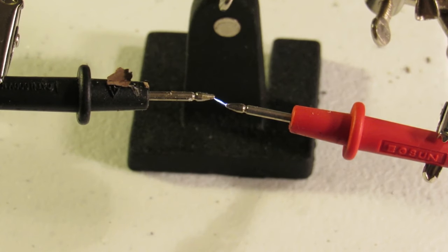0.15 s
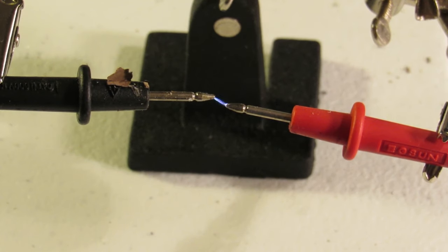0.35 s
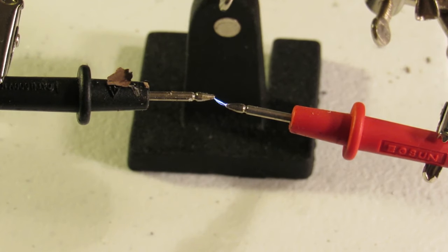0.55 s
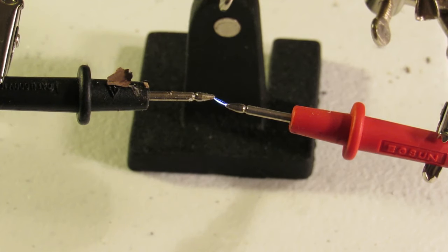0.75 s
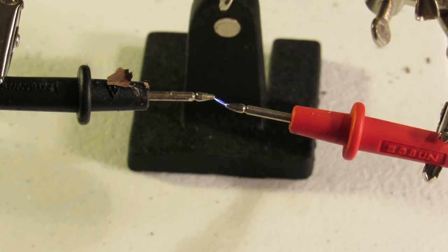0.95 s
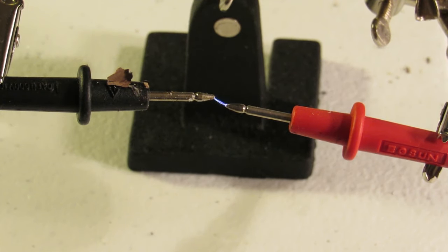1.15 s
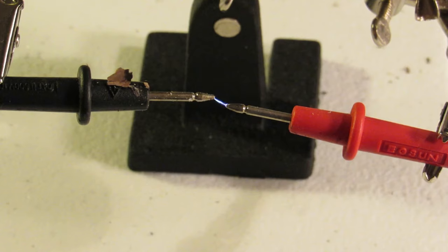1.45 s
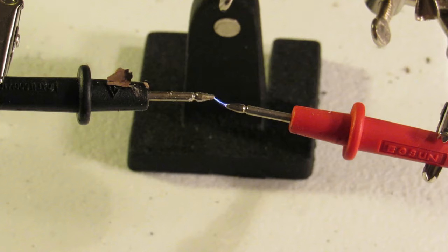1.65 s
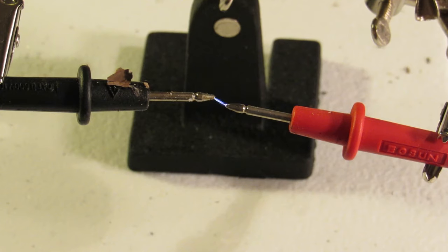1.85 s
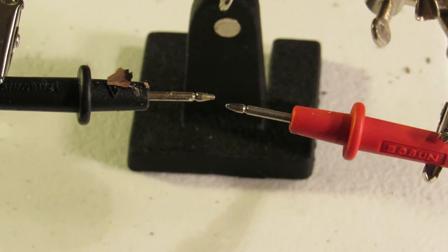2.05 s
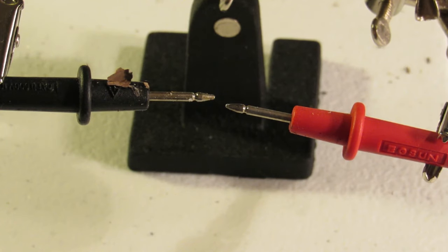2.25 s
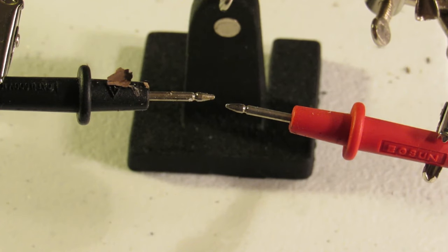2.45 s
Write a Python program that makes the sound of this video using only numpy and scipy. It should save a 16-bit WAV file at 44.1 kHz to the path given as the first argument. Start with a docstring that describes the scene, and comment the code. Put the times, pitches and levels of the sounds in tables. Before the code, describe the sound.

A harsh electric arc buzzes between two probe tips after a short quiet lead-in, wavering between whine and rasp, then cuts off and zaps twice briefly; close stereo microphone, small room, faint machine hum.

```python
"""On a workbench in a small room, a high-voltage arc burns between two probe tips, breaks off and strikes twice
more briefly; at the start only the room tail of an earlier burn is heard. The arc is a relaxation oscillator of
about 730 sparks a second: even spells whine, spells of early strikes rasp. Each snap is an impulse train
bounced off the stand and bench, then convolved with decaying noise for the clutter and room. Sine partials make
a faint machine hum, shaped noise makes the workshop air, and damped sines make a few soft knocks."""
import sys
import numpy as np
from scipy import signal
from scipy.fft import rfft, irfft
from scipy.io import wavfile

SR = 44100
rng = np.random.default_rng(int(sys.argv[2]) if len(sys.argv) > 2 else 0)


def output_pcm(signal):
    """Save a mono or channel-first signal as 16-bit PCM at the path in sys.argv[1].

    Samples are clipped to [-1, 1] before scaling.
    """
    pcm = np.clip(np.atleast_2d(signal).T, -1, 1) * 32767
    wavfile.write(sys.argv[1], SR, np.round(pcm).astype(np.int16))


N = 114660


def undb(db):
    """Decibel definition: 20 dB is a tenfold amplitude."""
    return 10 ** (np.asarray(db) / 20)


def rms(x):
    """Effective value: the root of the mean power."""
    return np.sqrt(np.mean(x ** 2))


def over_hz(points, size):
    """Logarithmic frequency scale: (Hz, value) points are joined along it at the bins of a transform."""
    hz, value = np.array(points, float).T
    bins_hz = np.fft.rfftfreq(size, 1 / SR)
    return np.interp(np.log(bins_hz + 1), np.log(hz), value)


def minimum_phase(points, size=1024):
    """Minimum phase: folding the cepstrum gives the most compact causal response with a given spectrum."""
    cepstrum = irfft(np.log(undb(over_hz(points, size))))
    cepstrum[1:size // 2] *= 2
    cepstrum[size // 2 + 1:] = 0
    return irfft(np.exp(rfft(cepstrum)))


def clicks(times, gains, size, order=8):
    """Band-limited interpolation: a windowed sinc places each impulse between samples."""
    at = times[:, None] * SR
    taps = np.floor(at).astype(int) + np.arange(1 - order, order + 1)
    window = np.sinc((taps - at) / order)
    shape = np.sinc(taps - at) * window * gains[:, None]
    return np.bincount(np.clip(taps, 0, size - 1).ravel(), shape.ravel(), size)


def cut(x, hz, kind, order=2):
    """Butterworth filtering: a maximally flat low-pass or high-pass."""
    return signal.sosfilt(signal.butter(order, hz, kind, fs=SR, output="sos"), x)


# partials of the machine: pitch_hz [Hz], left level_db [dB, rms], right_gain [ratio to left]
HUM_PARTIALS = [(213, -62.5, .6), (426, -67, .7), (852, -54.6, 1.), (1278, -55.3, 1.)]


def hum():
    """Fourier synthesis: steady sines add up to the hum of a small running machine."""
    t = np.arange(N) / SR
    out = np.zeros((2, N))
    for pitch_hz, level_db, right_gain in HUM_PARTIALS:
        sine = np.sin(2 * np.pi * (pitch_hz * t + rng.random()))
        out += np.sqrt(2) * undb(level_db) * np.array([[1], [right_gain]]) * sine
    return out


# relative spectrum of the workshop air: pitch_hz [Hz], level_db [dB per Hz]
AIR_SPECTRUM = [(20, -18), (45, 2), (90, -.5), (160, 7), (250, 4), (330, -1.5), (520, 0), (680, -9),
                (900, -6), (1300, -12.5), (2000, -22), (2900, -19), (4000, -30), (6000, -32),
                (15000, -35.5)]
# likeness of the air in the two channels: pitch_hz [Hz], likeness [-1 to 1]
AIR_LIKENESS = [(60, -.6), (130, -.4), (300, -.4), (600, .25), (1100, .8), (1800, .99), (5000, .99),
                (10000, .7)]
AIR_DB = -47.6  # rms before the microphone


def air():
    """Diffuse-field coherence: mid and side noise shares make a soft rush, wide in the bass, centred above."""
    likeness = np.clip(over_hz(AIR_LIKENESS, N), -.9, .99)
    shares = np.sqrt([1 + likeness, 1 - likeness])
    noise = rng.standard_normal((2, N))
    mid, side = irfft(rfft(noise) * undb(over_hz(AIR_SPECTRUM, N)) * shares, N)
    both = np.array([mid + side, mid - side])
    return both * undb(AIR_DB) / rms(both)


LEAD_S = .2  # time computed before the first audible sample
FLICKER_HZ = 55  # fresh random values per second


def writhing(times):
    """Random modulation: the channel writhes, a slow chance of about unit spread at the given times."""
    knots = rng.standard_normal(1024)
    return 1.2 * np.interp((times + LEAD_S) * FLICKER_HZ, np.arange(len(knots)), knots)


# spells in which the arc burns; of the first only the room tail is heard:
# start_s [s], end_s [s], level_db [dB], extra_unrest [added share of slightly early strikes, 0-1]
BURNS = [(-.11, -.075, 0, .3), (.2124, 2.066, 0, 0), (2.2122, 2.2415, .9, .7), (2.326, 2.3372, .6, .6)]
# state of the arc, joined by straight lines: time_s [s], spark_rate_hz [Hz],
# unrest [share of slightly early strikes, 0-1], premature [share of much earlier strikes, 0-1], level_db [dB]
ARC_STATE = [(.21, 731, .55, .02, .5), (.29, 732, .5, .03, .3), (.34, 732, .55, .35, 0),
             (.41, 732, .3, .03, -.4), (.5, 733, .5, .15, 0), (.62, 733, .4, .02, .2),
             (.74, 733, .8, .02, .3), (.9, 734, .55, .07, 0), (.97, 732, .18, .02, 1.5),
             (1.09, 729, .25, .05, .6), (1.21, 723, .5, .6, 0), (1.27, 729, .2, .1, .3),
             (1.36, 726, .2, .08, -.3), (1.46, 728, .12, .02, -.7), (1.52, 730, .75, .17, -.5),
             (1.68, 727, .3, .17, -1.4), (1.84, 728, .28, .08, -.6), (2.05, 733, .15, .06, .5)]
JITTER_MS = .004  # spread of every wait
EARLY_MS, EARLY_SPREAD_MS = .03, .05  # how much sooner a slightly early spark strikes
PREMATURE_MS, PREMATURE_SPREAD = .215, .07  # how much sooner a much earlier one strikes; spread as a ratio
SPARK_SCATTER_DB, FLICKER_DB = .8, .25  # level spread from spark to spark, and from the writhing
FLICKER_UNREST = .55  # spread the writhing gives to the log of both early shares


def sparks():
    """Relaxation oscillator: the gap recharges and breaks down; a spark struck early is weaker."""
    grid = np.arange(-LEAD_S, N / SR, .001)
    when, *columns = np.array(ARC_STATE).T
    rate_hz, unrest, premature, level_db = (np.interp(grid, when, column) for column in columns)
    restless = np.exp(FLICKER_UNREST * writhing(grid) - FLICKER_UNREST ** 2 / 2)
    level_db = level_db + FLICKER_DB * writhing(grid)
    times, sizes = [], []
    for start_s, end_s, burn_db, extra_unrest in BURNS:
        dice = rng.random(size=(2048, 2))
        scatter = rng.standard_normal(size=(2048, 3))
        t, charge = start_s, 1
        for (early_die, premature_die), (slip, early, strength) in zip(dice, scatter):
            if t > end_s:
                break
            i = np.searchsorted(grid, t) - 1
            times.append(t)
            sizes.append(charge * undb(burn_db + level_db[i] + SPARK_SCATTER_DB * strength))
            shift_ms = JITTER_MS * slip
            if premature_die < premature[i] * restless[i]:
                shift_ms -= PREMATURE_MS * (1 + PREMATURE_SPREAD * early)
            elif early_die < unrest[i] * restless[i] + extra_unrest:
                shift_ms -= EARLY_MS + EARLY_SPREAD_MS * early
            wait = 1 / rate_hz[i] + shift_ms / 1000
            t += wait
            charge = wait * rate_hz[i]  # the charge grows with the wait
    return np.array(times), np.array(sizes)


def tail(t60, delay, size):
    """Exponential reverberation: diffuse stereo decay of unit energy, partly alike in both channels."""
    t = np.arange(size) / SR - delay
    mid, side = rng.standard_normal((2, size)) * [[1], [.7]]
    decay = (t > 0) * np.exp(-np.log(1000) * np.abs(t) / t60)
    response = np.array([mid + side, mid - side]) * decay
    return response / np.sqrt(np.sum(response ** 2) / 2)


BENCH_DB, BENCH_T60_S, BENCH_DELAY_S = -4.6, .022, .0003  # scatter from nearby clutter
ROOM_DB, ROOM_DELAY_S = -10, .003
ROOM_T60_S, ROOM_TREBLE_T60_S, ROOM_SPLIT_HZ = .29, .215, 7000


def surroundings():
    """Superposed decays: short bench scatter, and a room whose treble dies sooner."""
    size = SR // 2
    room = cut(tail(ROOM_T60_S, ROOM_DELAY_S, size), ROOM_SPLIT_HZ, "low")
    room += cut(tail(ROOM_TREBLE_T60_S, ROOM_DELAY_S, size), ROOM_SPLIT_HZ, "high")
    return undb(ROOM_DB) * room + undb(BENCH_DB) * tail(BENCH_T60_S, BENCH_DELAY_S, size)


WIDE_HZ = 6000  # the arc differs between the channels mainly above this
# resonances of the microphone: pitch_hz [Hz]
RING_HZ = (7600, 8900, 10300, 13000)
RING_Q = 8


def ports(x):
    """All-pass dispersion: two close ports, alike below the treble, smear snaps around their resonances."""
    hz = np.fft.rfftfreq(x.shape[1], 1 / SR)
    width = hz ** 4 / (hz ** 4 + WIDE_HZ ** 4)
    mid = x.mean(axis=0)
    side = irfft(rfft(x[0] - x[1]) / 2 * width, x.shape[1])
    pair = np.array([mid + side, mid - side])
    for ring_hz in RING_HZ:
        # subtracting twice the peak turns the phase but leaves the level
        pair = pair - 2 * signal.lfilter(*signal.iirpeak(ring_hz, RING_Q, fs=SR), pair)
    return pair


# paths from the gap to the microphone, inverted where the gain is negative:
# left_delay_ms [ms], right_delay_ms [ms], left_gain [ratio], right_gain [ratio]
PATHS = [(0, 0, 1, .88), (.293, .285, -.41, -.31), (.382, .375, .2, .22), (.603, .591, .19, .09),
         (.756, .758, .23, .18)]
# relative spectrum of one snap: pitch_hz [Hz], level_db [dB]
SNAP_SPECTRUM = [(200, -42), (740, -21), (1000, -25), (1400, -26), (2000, -17), (2550, -17.5),
                 (2900, -10.5), (3350, -16.5), (3800, -12), (4400, -8.8), (5100, -14), (6000, -10.5),
                 (6700, -5.3), (8000, -3.5), (9500, -.4), (10500, -.7), (11600, -.7), (12400, -3.5),
                 (13100, 0), (14800, -2.6), (16000, -14)]
WANDER_MS, WRITHE_MS = .007, .01  # spread of reflected paths: from spark to spark, and from the writhing
KINK_GAIN, KINK_MS = .23, .75  # small snaps from kinks: size spread relative to the main snap, longest delay
ARC_DB = -18.2  # rms from 0.5 to 2 s, before the low-mid dip and top cut


def arc(count=4):
    """Multipath convolution: crooked sparks snap, arrive by a few short paths, ring in clutter and room."""
    lead = int(LEAD_S * SR)
    space = surroundings()
    times, sizes = sparks()
    wander_ms = WANDER_MS * rng.standard_normal(size=(4096, len(PATHS)))[:len(times)]

    # every spark has its own kinks, each adding a small snap
    kink_ms = KINK_MS * rng.random(size=(4096, count))[:len(times)]
    kink_gain = KINK_GAIN * rng.standard_normal(size=(4096, count))[:len(times)]
    snap_ms = np.column_stack([np.zeros(len(times)), kink_ms])
    snap_gain = np.column_stack([np.ones(len(times)), kink_gain])
    # the snaps share the spark's energy
    snap_gain *= (sizes / np.linalg.norm(snap_gain, axis=1))[:, None]

    near = np.zeros((2, N + lead))
    for k, path in enumerate(PATHS):
        # the direct path, k = 0, stays put
        shift_ms = (k > 0) * (wander_ms[:, k] + WRITHE_MS * writhing(times))
        for channel in range(2):
            delay_ms = path[channel] + shift_ms[:, None] + snap_ms
            at = times[:, None] + LEAD_S + delay_ms / 1000
            near[channel] += path[2 + channel] * clicks(at.ravel(), snap_gain.ravel(), N + lead)

    reverberant = signal.fftconvolve(near.mean(axis=0)[None], space, axes=1)[:, :N + lead]
    smeared = ports(near + reverberant)
    heard = signal.fftconvolve(smeared, minimum_phase(SNAP_SPECTRUM)[None], axes=1)[:, lead:lead + N]
    return heard * undb(ARC_DB) / rms(heard[:, SR // 2:2 * SR])


# soft knocks and the pitches they ring at:
# start_s [s], pitch_hz [Hz], level_db [dB, before rise and decay], decay_s [s, to 1/e]
KNOCKS = [(1.2, 98, -41, .014), (1.202, 290, -45, .01), (1.685, 1000, -45, .012)]


def knocks():
    """Damped resonance: each faint workshop knock is a sine that dies away exponentially."""
    out = np.zeros(N)
    for start_s, pitch_hz, level_db, decay_s in KNOCKS:
        age = np.maximum(np.arange(N) / SR - start_s, 0)
        envelope = np.minimum(age / .003, 1) * np.exp(-age / decay_s)  # 3 ms rise
        out += undb(level_db) * np.sin(2 * np.pi * pitch_hz * age) * envelope
    return out


def scene():
    """Linear superposition: the sound pressures of all sources add."""
    return hum() + air() + knocks() + arc()


NOTCH_HZ, NOTCH_Q, TOP_HZ = 672, 5, 14900


def record(dry):
    """Transducer response: the sound has a narrow dip in the low mids and a steep top cut."""
    dipped = signal.lfilter(*signal.iirnotch(NOTCH_HZ, NOTCH_Q, fs=SR), dry)
    # order 10, ripple 0.2 dB, stop band 80 dB down
    return signal.sosfilt(signal.ellip(10, .2, 80, TOP_HZ, fs=SR, output="sos"), dipped)


dry = scene()
out = record(dry)
output_pcm(out)
```